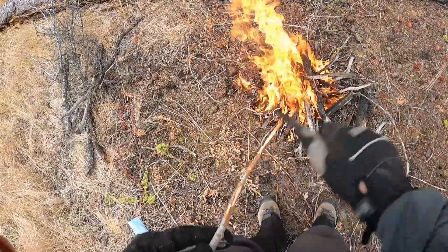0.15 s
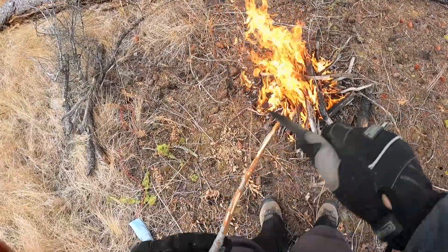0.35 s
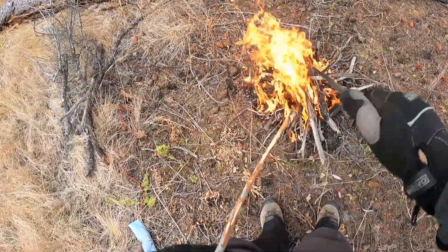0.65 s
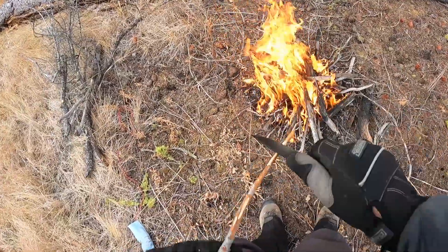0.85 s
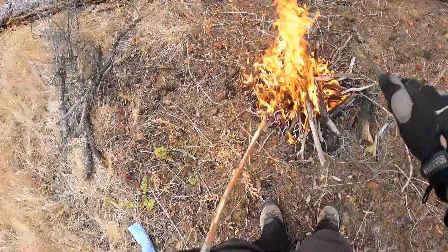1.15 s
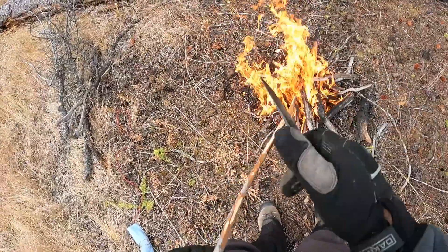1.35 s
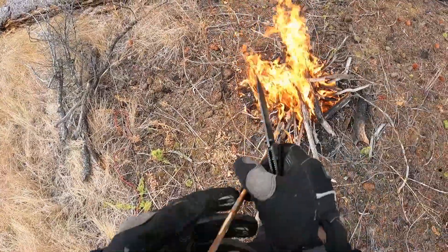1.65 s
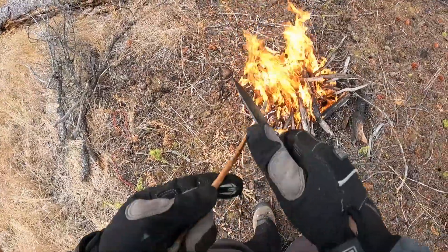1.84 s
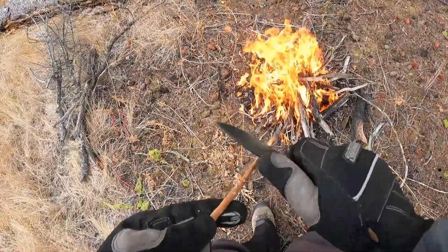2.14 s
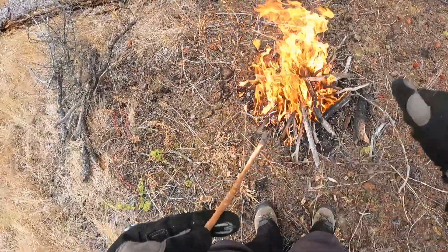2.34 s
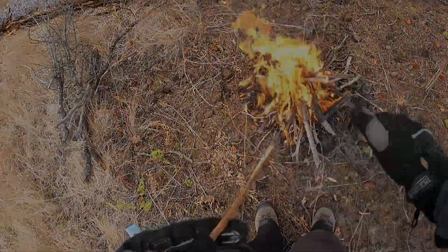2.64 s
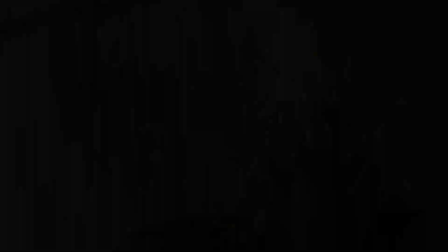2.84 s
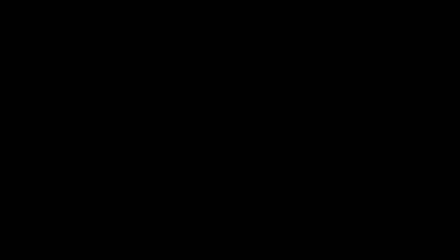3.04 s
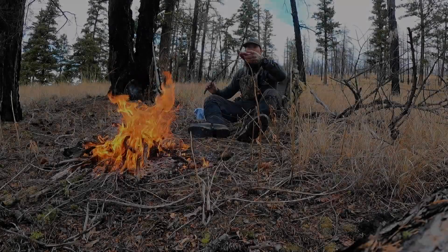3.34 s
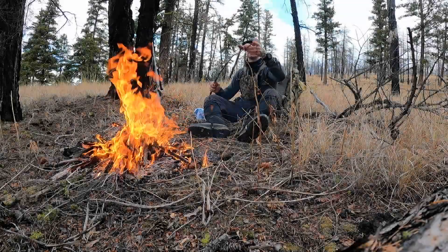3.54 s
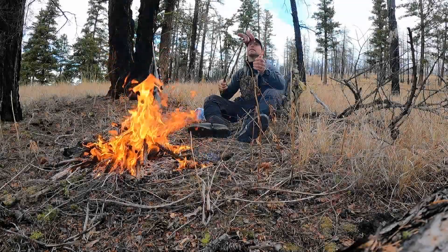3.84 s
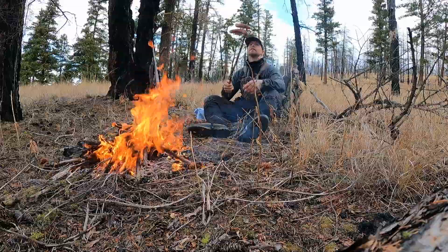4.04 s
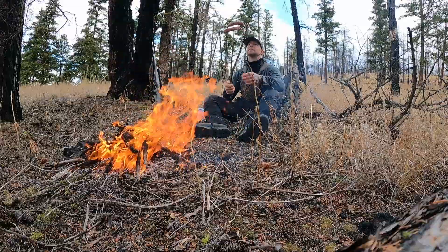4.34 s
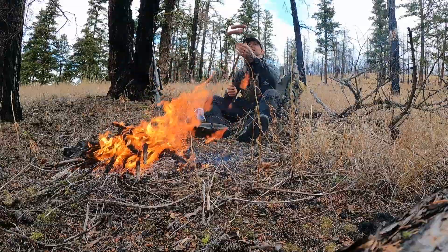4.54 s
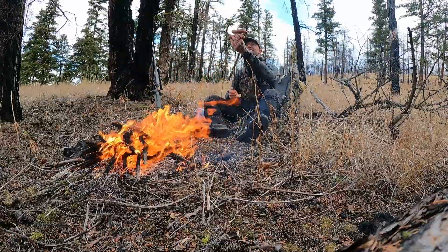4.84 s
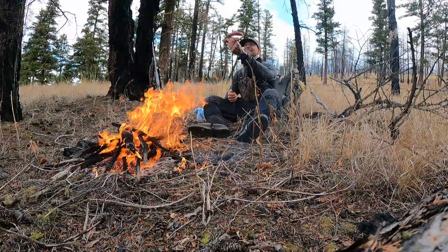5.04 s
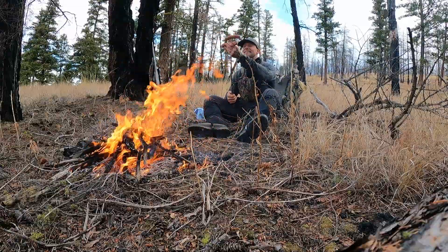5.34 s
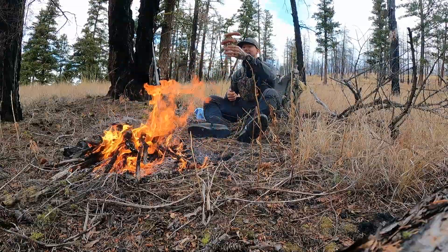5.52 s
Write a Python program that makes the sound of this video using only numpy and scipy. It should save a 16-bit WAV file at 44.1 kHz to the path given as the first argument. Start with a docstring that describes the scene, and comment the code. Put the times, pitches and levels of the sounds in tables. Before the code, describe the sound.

A small outdoor campfire crackles densely up close with gear rattles and air thumps, then shifts to a more distant, quieter view.

```python
"""Sharp pops burst from a small fire of dry twigs over fine crackle and flurries of sizzling gas.
The place is a forest clearing: a camera worn just above the fire hears it first, then one listens
from the ground further off. Each pop is a pressure pulse with splinter noise and a ringing twig; crackle and
sizzle are many tiny random bursts; filtered noise makes the flames rumble and flutter.
Decaying noise echoes the wood; gear rattles on the worn camera, and puffs of air thump the microphone."""
import sys
import numpy as np
from scipy import signal
from scipy.fft import rfft, irfft
from scipy.io import wavfile
from scipy.ndimage import uniform_filter1d

SR = 44100
rng = np.random.default_rng(int(sys.argv[2]) if len(sys.argv) > 2 else 0)


def wav_out(sig):
    """Save sig, one row per channel (or a flat mono array), as 16-bit PCM at SR to the path in sys.argv[1]."""
    wavfile.write(sys.argv[1], SR, np.round(np.clip(np.atleast_2d(sig).T, -1, 1) * 32767).astype(np.int16))


N = 250488
MOVE_S = 3.28  # from here on the fire is heard from the ground further off


def undb(db):
    """Decibels to gain."""
    return 10 ** (np.asarray(db) / 20)


def unit(x):
    """Scale to rms 1."""
    return x / np.sqrt(np.mean(x ** 2) + 1e-20)


def curve(table, axis):
    """One column of a table, joined by straight lines in time."""
    rows = np.array(table)
    return np.interp(np.arange(N) / SR, rows[:, 0], rows[:, axis])


def freqs(x):
    """Frequency of each bin of a sound in Hz, at least 1."""
    return np.maximum(np.fft.rfftfreq(x.shape[-1], 1 / SR), 1)


def colour(x, points):
    """Filter by (Hz, dB) points, joined along log frequency."""
    hz, db = np.transpose(points)
    gain = undb(np.interp(np.log(freqs(x)), np.log(hz), db))
    return irfft(rfft(x) * gain, x.shape[-1])


def ring(x, modes):
    """Pass through parallel resonances, each (Hz, width in Hz, dB)."""
    f = freqs(x)
    response = sum(undb(db) / (1 + 1j * (f * f - hz * hz) / (f * width)) for hz, width, db in modes)
    return irfft(rfft(x) * response, x.shape[-1])


def walk(rate):
    """Random levels held for 1 / rate s, then smoothed by two moving averages."""
    hold = max(int(SR / rate), 1)
    steps = np.repeat(rng.standard_normal(N // hold + 1), hold)
    smooth = uniform_filter1d(uniform_filter1d(steps, hold), hold)
    return unit(smooth[:N])


def swell(t, rise, decay):
    """An envelope that grows up to t = 0 and dies away after it."""
    return np.exp(np.minimum(t, 0) / rise - np.maximum(t, 0) / decay)


def add(out, sound, start):
    """Mix a short sound in from a given sample on."""
    a, b = max(start, 0), min(start + sound.shape[-1], N)
    out[:, a:b] += sound[:, a - start:b - start]


def clearing(x, ground_db, trees_db, ground_s, trees_s, size=16384):
    """Two layers of short decaying noise echo, one from the ground and one from the trunks."""
    t = np.arange(size) / SR
    noise = rng.standard_normal((2, size)) * (1 - np.exp(-t / 0.00078))
    ground = undb(ground_db) * unit(noise * np.exp(-t / ground_s))
    # swapped channels give the trunks a different pattern on each side
    trees = undb(trees_db) * unit(noise[::-1] * np.exp(-t / trees_s))
    echo = (ground + trees) / np.sqrt(size)
    return x + signal.fftconvolve(x, echo, axes=1)[:, :N]


# How hard the flames blow. Each row: time in seconds, relative level in dB.
BLOW = [(0, -52), (.15, -43.5), (.45, -42), (1.1, -39), (1.4, -45), (2.0, -43.5), (2.67, -43), (2.8, -50),
        (3.4, -42.5), (4.0, -46.5), (4.3, -41.5), (4.6, -45), (4.95, -38.5), (5.25, -35.5), (5.68, -41.5)]
# Spectrum of the deep rumble. Each row: frequency in Hz, relative level in dB.
RUMBLE_SPECTRUM = [(14, -21), (25, -0.5), (60, -3.5), (110, -8.5), (170, -9), (260, -21.5), (500, -84.5)]
# Spectrum of the flutter. Each row: frequency in Hz, relative level in dB.
FLUTTER_SPECTRUM = [(100, -11), (200, -3), (380, -3.5), (600, -11), (800, -16.5), (1400, -21), (3000, -39),
                    (7000, -45.5), (16000, -59)]
# Resonances of the worn camera's mount. Each row: frequency in Hz, width in Hz, relative level in dB.
MOUNT_MODES = [(237, 86, 0.92), (330, 150, 0.5)]
FLAMES_USUAL_DB = -43
FLUTTER_DB_PER_DB = 0.3  # the flutter grows more slowly than the rumble


def flames(worn, rumble_db=5.5, flutter_db=-49.5, mount_db=1, shield_db=-3, lick_db=2.5, gust_db=1.43):
    """Turbulent burning: a deep rumble, and a flutter that swells with each lick and booms in the worn mount."""
    blow = curve(BLOW, axis=1)
    rumble = unit(colour(rng.standard_normal((2, N)), RUMBLE_SPECTRUM))
    rumble = rumble * undb(blow + rumble_db + gust_db * walk(14))
    licks = flutter_db + FLUTTER_DB_PER_DB * (blow - FLAMES_USUAL_DB) + lick_db * walk(30)
    flutter = unit(colour(rng.standard_normal((2, N)), FLUTTER_SPECTRUM)) * undb(licks)
    boom = undb(mount_db) * ring(flutter * worn, MOUNT_MODES)
    return rumble + flutter * undb(shield_db * worn) + boom


# Puffs of air on the microphone.
# Each row: centre in seconds, pitch in Hz, half-width of the bell envelope in cycles,
# level in dB of the sine before that envelope.
AIR_PUFFS = [(.394, 110, 0.74, -21.5), (0.796, 81, 0.4, -18.5), (.966, 76.4, 0.21, -22.5),
             (1.118, 71, 0.82, -25.5), (1.179, 171, 0.92, -23.5), (2.097, 103, 0.53, -24),
             (2.313, 44, 1.6, -25.5), (4.189, 40.6, 1.2, -30), (5.588, 31.6, 0.27, -17)]


def puffs():
    """Each eddy pushes and pulls the diaphragm: a low sine under a short bell-shaped envelope."""
    t = np.arange(N) / SR
    total = 0
    for s, hz, cycles, db in AIR_PUFFS:
        envelope = np.exp(-((t - s) * hz / cycles) ** 2)
        total = total - undb(db) * envelope * np.sin(2 * np.pi * hz * (t - s))
    return total


# Gear rattling against the worn camera.
# Each row: peak in seconds, decay in seconds, level in dB, mount thud in dB relative to the ringing.
GEAR_RATTLES = [(.075, 0.0096, -39.5, 6), (0.2, 0.0071, -25, -6), (0.233, 0.0055, -19.5, -20),
                (.605, 0.013, -32, -7.5), (0.881, 0.0095, -28.5, -1), (1.078, 0.022, -32, -1.5),
                (1.111, 0.013, -42.5, 12.5), (2.229, 0.009, -36.5, 9), (2.259, 0.0096, -23, -4.5),
                (2.639, 0.022, -35.5, 0.5), (2.896, 0.0052, -33, 5.5), (2.924, 0.006, -23.5, -1),
                (3.19, 0.0035, -41.5, 11.5)]
# The loose gear's own ringing. Each row: frequency in Hz, width in Hz, relative level in dB.
GEAR_MODES = [(810, 290, -1.5), (1320, 370, 1), (1965, 340, 5.5), (2610, 150, 11), (3680, 160, 7),
              (5190, 1200, 2.5)]
# Soft contacts lose the treble. Each row: frequency in Hz, relative level in dB.
SOFT_CONTACT = [(4000, 15), (7000, -3), (16000, -38)]
RATTLE_RISE = 0.76  # a rattle builds up with this share of its decay time


def rattles(rate=900, size=8192, level_db=0):
    """Loose gear chatters in a quick run of contacts: it rings, and the camera mount thuds."""
    out, t = np.zeros((2, N)), (np.arange(size) - size // 2) / SR
    for s, decay, db, thud_db in GEAR_RATTLES:
        force = swell(t, RATTLE_RISE * decay, decay)
        contacts = (rng.random(size) < rate / SR) * rng.standard_normal(size)
        chatter = (unit(contacts) + rng.standard_normal(size) / 2) * force
        ringing = unit(colour(ring(chatter, GEAR_MODES), SOFT_CONTACT))
        thud = undb(thud_db) * unit(ring(chatter, MOUNT_MODES))
        gain = undb(db + level_db) * np.sqrt(np.mean(force ** 2))
        add(out, gain * (ringing + thud)[None], int(s * SR) - size // 2)
    return out


# Centres of the pitch bands of the tiny bursts, in Hz.
BURST_BANDS = [1100, 2100, 3900, 7000, 12000]
# Colour shared by crackle and sizzle. Each row: frequency in Hz, relative level in dB.
BURST_COLOUR = [(200, -7.5), (700, 7), (1300, 6), (3500, 9), (6500, 5), (8200, 0.5), (11000, -4),
                (12500, -4.5), (16000, -19)]
GRAIN_S = .003  # decay time of each fizz


def grains(rate, spread_db, fizz_db, octaves=1.43):
    """Tiny bursts, most faint and a few loud, each with a brief fizz: coarse fibres dull, fine ones bright."""
    at = np.flatnonzero(rng.random(N) < rate / SR)
    sizes = undb(spread_db * np.minimum(rng.exponential(size=len(at)), 3.5))
    sizes = sizes * rng.choice([-1, 1], len(at))
    bands = np.log2(BURST_BANDS)
    pitches = rng.uniform(bands[0] - .5, bands[-1] + .5, len(at))
    noise, spectrum = rng.standard_normal((2, N)), 0
    for band, only in zip(bands, np.eye(len(bands))):
        # a burst is strongest in the bands near its own pitch
        ticks = np.bincount(at, sizes * np.exp(-((pitches - band) / octaves) ** 2), N)
        fizz_power = signal.lfilter([1], [1, -np.exp(-2 / (GRAIN_S * SR))], ticks ** 2)
        bursts = unit(ticks) + undb(fizz_db) * unit(np.sqrt(fizz_power) * noise)
        # overlapping triangular bands
        spectrum = spectrum + rfft(bursts) * np.interp(np.log2(freqs(ticks)), bands, only)
    return unit(colour(irfft(spectrum, N), BURST_COLOUR))


# Rising and falling crackle of bark and needles. Each row: time in seconds, relative level in dB.
CRACKLE_LEVEL = [(0, -67), (.11, -72), (.32, -67), (.55, -52), (.95, -48.5), (1.25, -54.5), (1.8, -52.5),
                 (2.1, -49), (2.8, -57), (3.3, -54.5), (3.5, -63), (4.05, -79.5), (4.7, -83), (5.68, -68)]


def crackle(level_db=3):
    """Bark and needles tick away in a random stream whose level rises and falls."""
    ticks = grains(rate=550, spread_db=5.5, fizz_db=-2)
    return ticks * undb(curve(CRACKLE_LEVEL, axis=1) + level_db)


# Further flurries of escaping gas, some between pops and some close to one.
# Each row: peak in seconds, length in seconds, relative level in dB.
GAS_FLURRIES = [(.16, 0.014, -44), (.205, 0.024, -39.5), (.261, 0.013, -41.5), (.331, 0.0074, -41),
                (.495, 0.017, -40.5), (.577, 0.025, -44.5), (.657, 0.0028, -43), (1.098, 0.01, -47),
                (1.331, 0.0031, -37), (1.431, 0.021, -44), (1.699, 0.0074, -38.5), (1.806, 0.012, -44.5),
                (1.975, 0.0052, -35.5), (2.156, 0.0025, -39), (2.948, 0.0073, -39), (3.076, 0.0053, -44),
                (3.554, 0.019, -44), (3.907, 0.045, -52), (4.196, 0.03, -47.5), (4.385, 0.011, -51.5),
                (4.475, 0.034, -55.5), (4.751, 0.015, -52.5), (4.85, 0.028, -52.5), (5.103, 0.016, -51.5)]
# every pop also lets out a jet: length in s, relative level in dB at a pop of 0 dB
GAS_ABOVE, GAS_AFAR = (0.011, -46.5), (0.017, -55)
GAS_DB_PER_DB, GAS_LAG_S = 0.45, 0.0014  # a stronger pop has a stronger jet; its peak lags the pop
JET_RISE = 0.87  # a jet of gas opens in this share of the time it takes to die away


def sizzle(level_db=1.5, steepness=2.75):
    """Escaping gas drives short, dense flurries of bursts: one with every pop, and further ones."""
    t = np.arange(0, N, 32) / SR  # a coarse time grid is enough for the envelope
    jets = list(GAS_FLURRIES)
    for s, db, _ in TWIG_POPS:
        length, gas_db = GAS_ABOVE if s < MOVE_S else GAS_AFAR
        jets.append((s + GAS_LAG_S, length, gas_db + GAS_DB_PER_DB * db))
    power = 0
    for s, length, db in jets:
        age = (t - s) / np.where(t < s, JET_RISE * length, length)
        power = power + undb(2 * db) / (1 + age ** 2 / 2) ** steepness
    envelope = np.interp(np.arange(N) / SR, t, np.sqrt(power))
    return grains(rate=2200, spread_db=5, fizz_db=-2) * envelope * undb(level_db)


# Bursting twigs. Each row: time in seconds, relative strength in dB, pitch of the twig in Hz.
TWIG_POPS = [(0.0088, 0.0, 6000), (0.038, -14, 1900.0), (0.0537, -8, 3840), (0.1427, -5.5, 4720),
             (0.1728, 2.0, 3460), (0.1832, -3.5, 6960), (0.3841, 10.5, 4500), (0.4337, -10, 4030),
             (0.4785, -4.5, 5030), (0.5003, -5, 7700), (0.5213, -6.5, 5000.0), (0.6588, -13.5, 4700.0),
             (0.7036, -3.5, 4500), (0.8023, -15.5, 3300.0), (0.8482, -10, 4640), (0.8785, -19, 2600.0),
             (0.9472, -8.5, 4900.0), (0.977, -6.5, 2900.0), (1.0678, 0.5, 4250), (1.1057, -7.0, 5400.0),
             (1.1725, 6, 4400), (1.3329, -8.5, 8100.0), (1.4225, -1, 3500.0), (1.437, -4.5, 3800.0),
             (1.4532, 3.5, 7200.0), (1.4854, 4.0, 3830), (1.507, -6.5, 8100.0), (1.535, -6.5, 2720),
             (1.561, -11, 2800.0), (1.5885, -7, 3300.0), (1.6335, 4, 4030), (1.7368, -6.5, 6400),
             (1.7755, 1, 2370), (1.7845, -4, 2900.0), (1.8559, 8, 3170), (1.8989, 0.5, 4730),
             (2.0714, -7, 5650), (2.1167, -3, 9900), (2.1549, -9, 8600), (2.2082, -6, 9000),
             (2.3652, -1, 3020), (2.4631, -0.5, 5050), (2.5148, -8, 2900.0), (2.5631, -10, 4230),
             (2.6023, 9.0, 4100), (2.625, -12, 4400.0), (2.6321, -4.5, 7600.0), (2.6658, -5, 2650),
             (2.8741, -2.5, 5240), (3.0679, -5.5, 6030), (3.0803, -9, 4370), (3.16, -10.5, 3500.0),
             (3.2015, -14.5, 2280), (3.2416, -1.5, 5400), (3.3709, -7, 5000), (3.5474, -5.5, 4700),
             (3.6188, -12.5, 3320), (3.652, -6, 5600), (3.7188, -11, 3200), (3.7442, -10, 5200),
             (3.8141, -2.5, 8100.0), (3.9259, -11.5, 2200), (4.1705, -10.5, 2480), (4.1811, -10, 2230),
             (4.3587, -17.5, 3430), (4.4839, -8, 2660), (4.5745, -12, 3400), (4.714, -26.5, 5000.0),
             (4.7446, -3.5, 7350), (4.7548, -13.5, 5800.0), (4.8145, -17, 5000.0), (4.8487, -13.5, 3100.0),
             (4.8918, -20.5, 3300.0), (5.068, -16.5, 4100.0), (5.0941, -19.5, 2200.0), (5.1904, -5, 4570),
             (5.2627, -18.5, 4400.0), (5.276, -20, 4670), (5.4135, -12.5, 4970), (5.5385, -22.5, 3630),
             (5.599, -4, 2360), (5.649, -20.5, 2200.0), (5.6775, -3.5, 2970)]
# A pop heard from above the fire. Each row: frequency in Hz, relative level in dB.
ABOVE_COLOUR = [(80, 1), (400, -3), (1000, -4), (1900, .5), (2900, 1), (4800, -0.5), (6800, -3),
                (8000, -10.5), (12800, -15.5), (16000, -34.5)]
# A pop heard from the ground further off. Each row: frequency in Hz, relative level in dB.
AFAR_COLOUR = [(80, -3.5), (400, 2.5), (1000, 8), (1900, 6), (2900, 2.5), (4800, 1), (6800, -5.5),
               (8000, -6), (12800, -10.5), (16000, -29)]
TWIG_RING_DB, TWIG_Q = -3, 3.5  # dry wood rings for only a few cycles
USUAL_TWIG_HZ, POP_PIVOT_HZ = 3800, 3000  # a twig of usual pitch has no tilt; others tilt about the pivot
TILT_PER_OCTAVE = 3.87  # dB per octave of tilt, for each octave of twig pitch


def pops(size=2048, swell_s=0.0016, splinter_s=0.001, splinter_db=1, pop_db=-5.0):
    """Noise swells briefly into each pop, the wood splits in one pressure pulse, splinters follow, the twig rings."""
    out, t = np.zeros((2, N)), (np.arange(size) - size // 4) / SR
    # bending waves in the twig run faster at high pitch, which spreads the pulse out in time
    pulse = irfft(np.exp(-1j * np.sqrt(freqs(t) / 40)) * rfft(t == 0), size)
    for s, db, hz in TWIG_POPS:
        splinters = unit(rng.standard_normal((2, size)) * swell(t, swell_s, splinter_s))
        burst = pulse + undb(splinter_db) * splinters / np.sqrt(size)
        burst = burst + ring(burst, [(hz, hz / TWIG_Q, TWIG_RING_DB)])
        # thin twigs are higher and brighter
        tilt = TILT_PER_OCTAVE * np.log2(hz / USUAL_TWIG_HZ)
        heard = ABOVE_COLOUR if s < MOVE_S else AFAR_COLOUR
        tone = [(f, base + tilt * np.log2(max(f / POP_PIVOT_HZ, 1 / 3))) for f, base in heard]
        add(out, undb(pop_db + db) * colour(burst, tone), int(s * SR) - size // 4)
    return out


# Ringing of the worn camera's case. Each row: frequency in Hz, width in Hz, relative level in dB.
CASE_MODES = [(1246, 510, 9.5), (1860, 150, -18.5), (2440, 100, 8), (3540, 480, 3.5), (5150, 4840, 3)]
# Colour of the wood heard from the ground. Each row: frequency in Hz, gain in dB.
GROUND_COLOUR = [(250, 3.5), (480, 12), (900, -1), (1400, -1), (2100, -3), (5500, -1), (8600, 3),
                 (10500, -2), (12300, -1)]


def scene():
    """The fire from above, coloured by the worn camera's case, then from the ground."""
    wood = pops() + crackle() + sizzle()
    worn = np.arange(N) / SR < MOVE_S
    near = clearing(wood * worn, ground_db=-9.5, trees_db=-21, ground_s=0.0056, trees_s=.018)
    near = undb(-3.0) * near + undb(-8.0) * ring(near, CASE_MODES)
    far = clearing(wood * ~worn, ground_db=-22, trees_db=-14.0, ground_s=0.018, trees_s=0.014)
    return near + colour(far, GROUND_COLOUR) + rattles() + flames(worn) + puffs()


# Gain of the left-right difference at the microphones. Each row: frequency in Hz, gain in dB.
SIDE_GAIN = [(30, -13), (120, -24), (400, -31), (1500, -19), (6000, -14), (10500, -10), (12000, 3)]
# The right port rings in the top octave. Each row: frequency in Hz, right minus left in dB.
PORT_BALANCE = [(11000, 0), (12200, 5), (16000, 5)]
CEILING, TOP_HZ = .5, 15600  # level that rounded peaks approach (full scale 1), and the top cutoff


def record(dry):
    """Two close ports, nearly mono except in the top octave; the loudest peaks are rounded and the top is cut."""
    mid = (dry[0] + dry[1]) / 2
    side = colour((dry[0] - dry[1]) / 2, SIDE_GAIN)
    left = colour(mid + side, [(hz, -db / 2) for hz, db in PORT_BALANCE])
    right = colour(mid - side, [(hz, db / 2) for hz, db in PORT_BALANCE])
    rounded = CEILING * np.tanh(np.array([left, right]) / CEILING)
    top_cut = signal.ellip(8, .2, 70, TOP_HZ, fs=SR, output="sos")
    return signal.sosfilt(top_cut, rounded)


dry = scene()
out = record(dry)
wav_out(out)
```